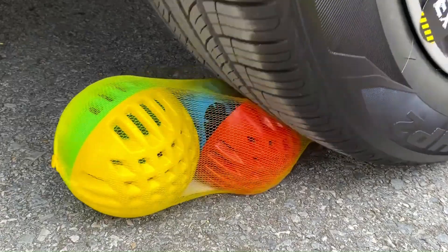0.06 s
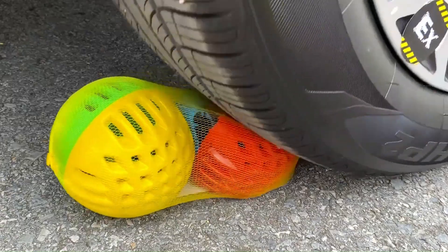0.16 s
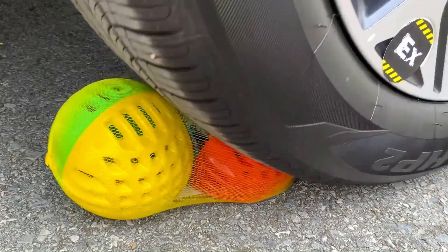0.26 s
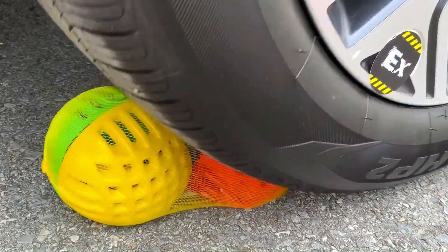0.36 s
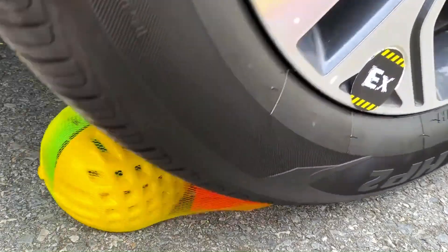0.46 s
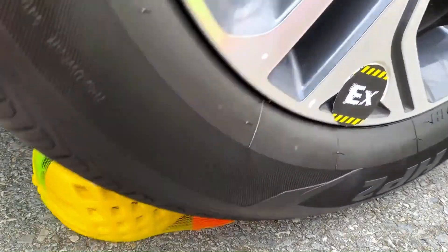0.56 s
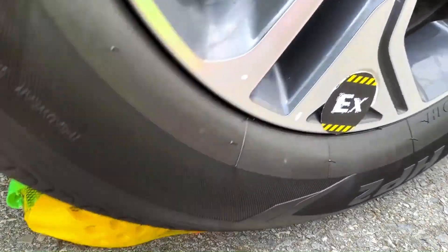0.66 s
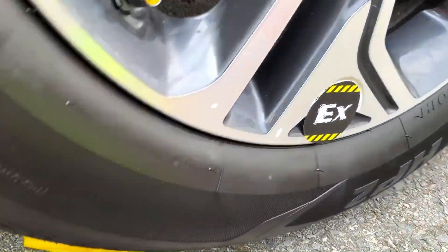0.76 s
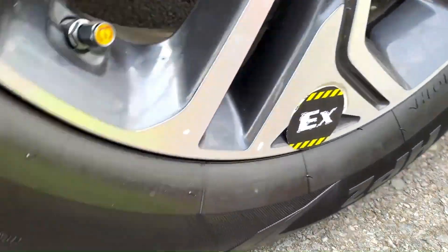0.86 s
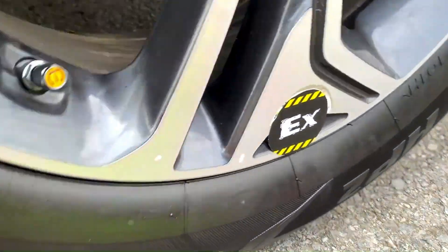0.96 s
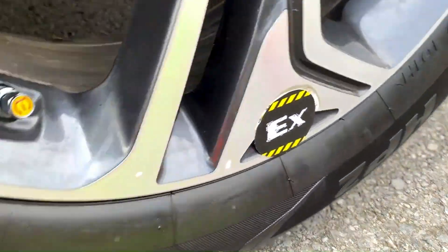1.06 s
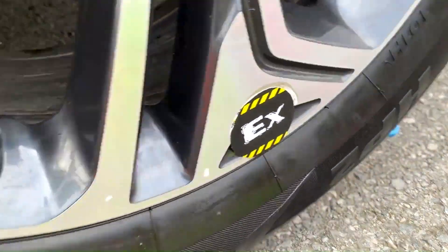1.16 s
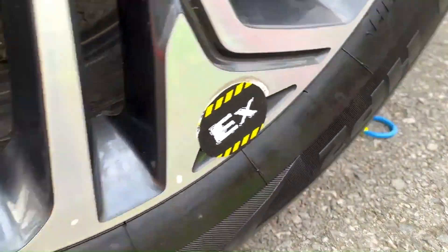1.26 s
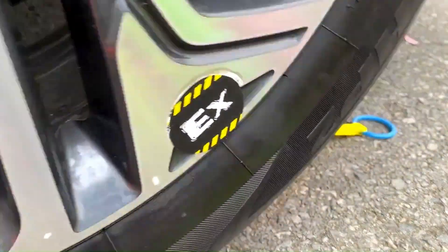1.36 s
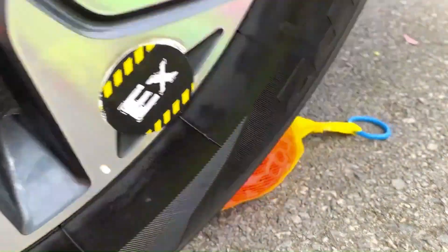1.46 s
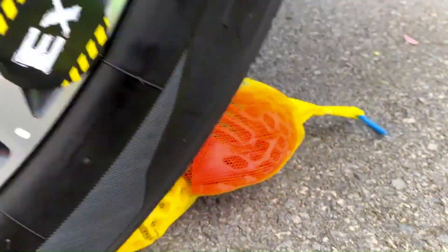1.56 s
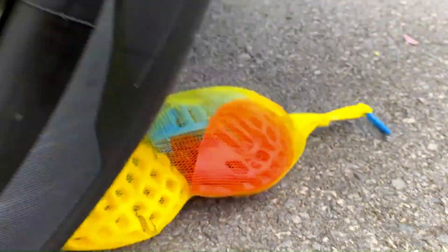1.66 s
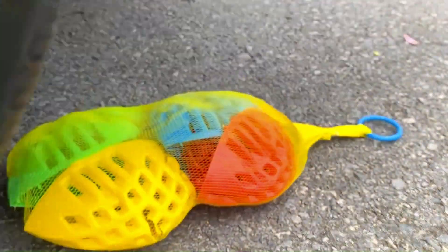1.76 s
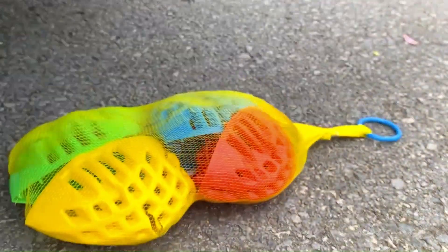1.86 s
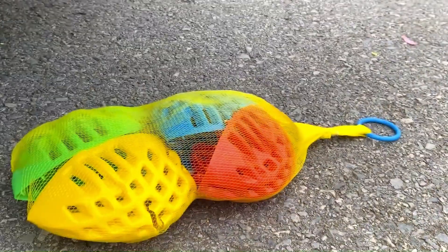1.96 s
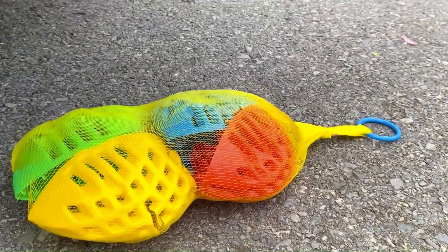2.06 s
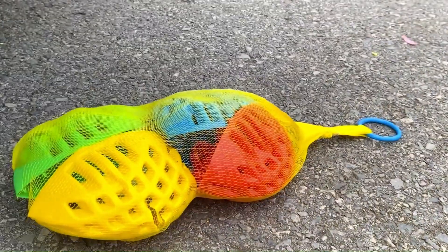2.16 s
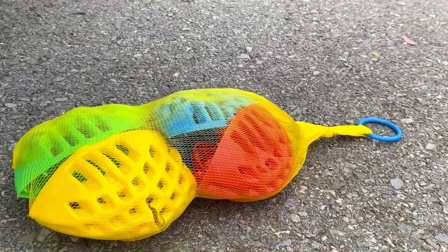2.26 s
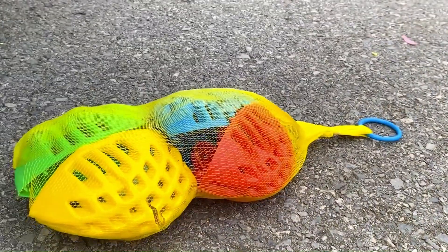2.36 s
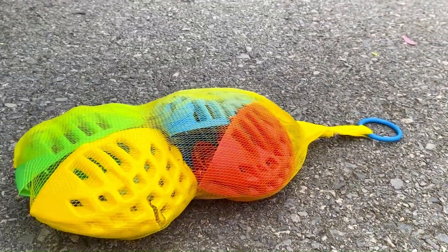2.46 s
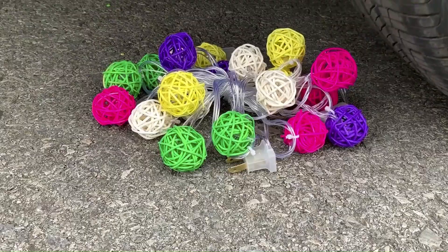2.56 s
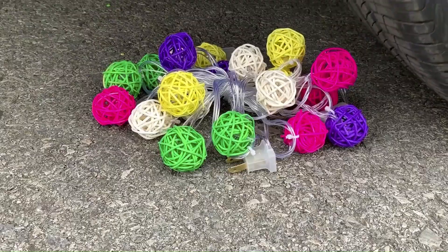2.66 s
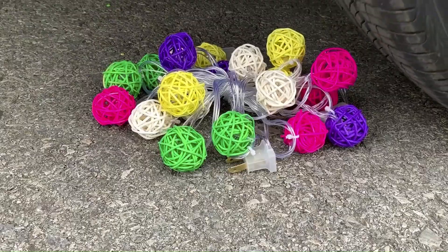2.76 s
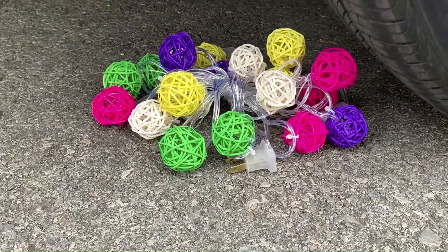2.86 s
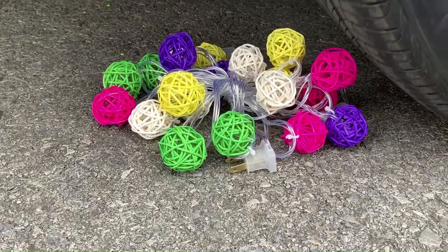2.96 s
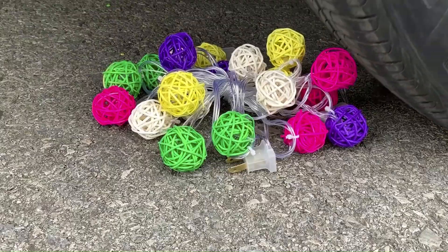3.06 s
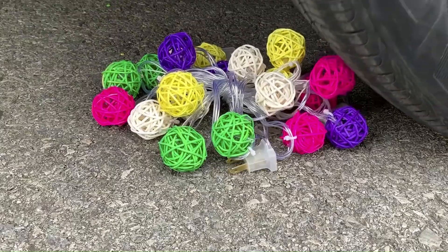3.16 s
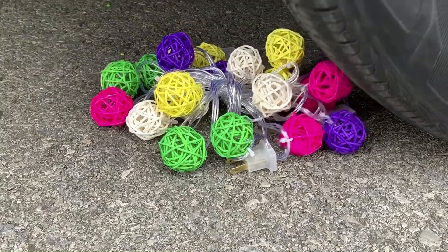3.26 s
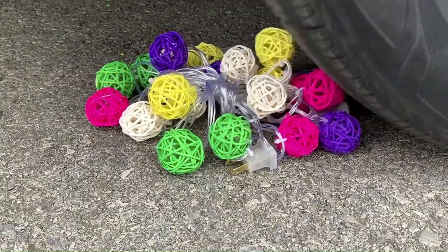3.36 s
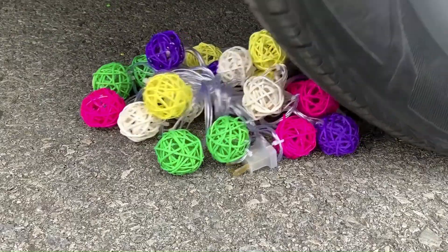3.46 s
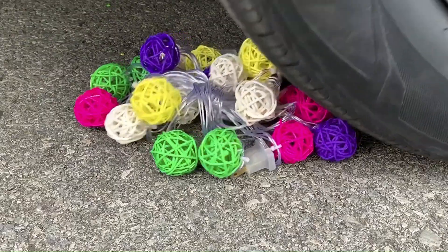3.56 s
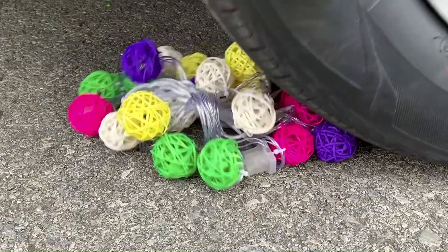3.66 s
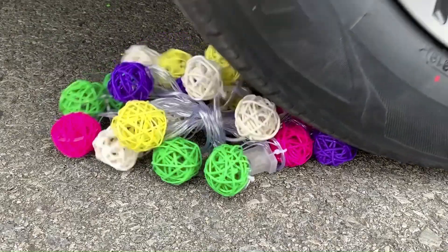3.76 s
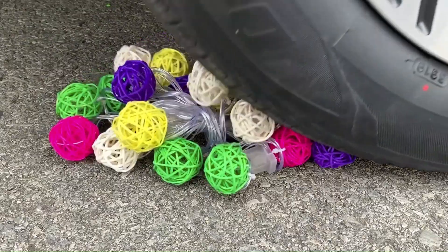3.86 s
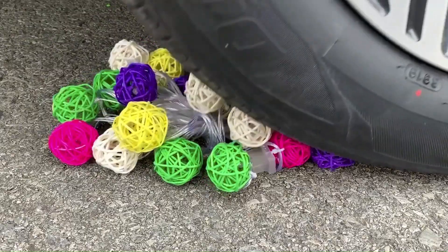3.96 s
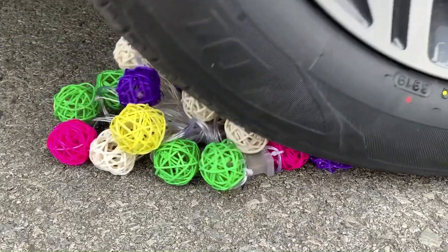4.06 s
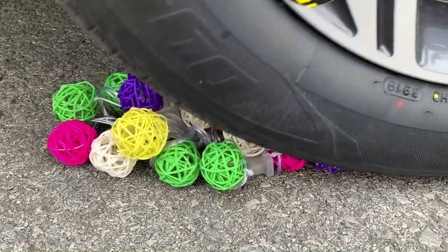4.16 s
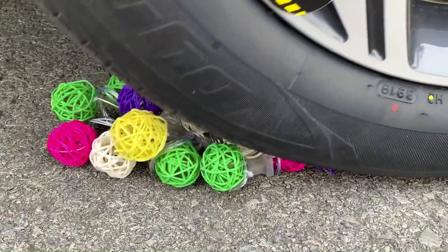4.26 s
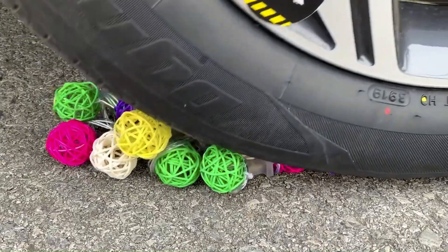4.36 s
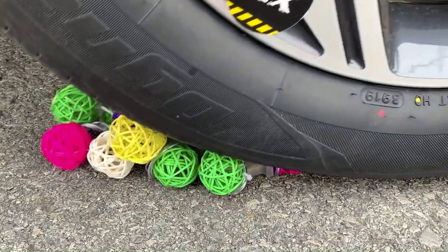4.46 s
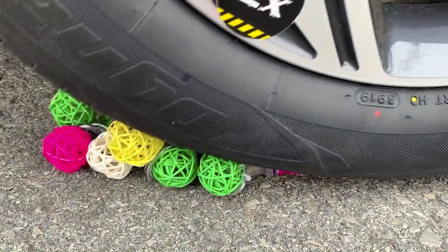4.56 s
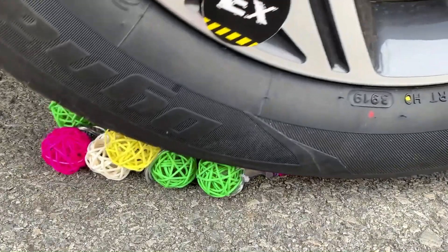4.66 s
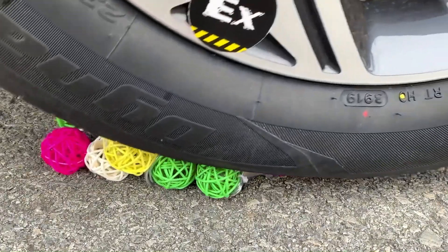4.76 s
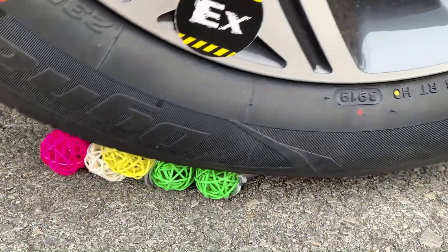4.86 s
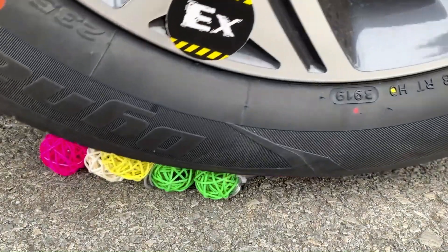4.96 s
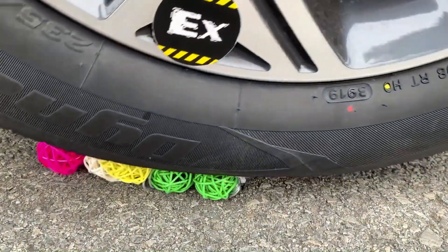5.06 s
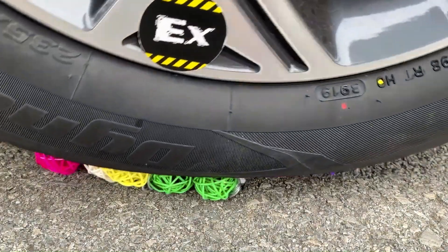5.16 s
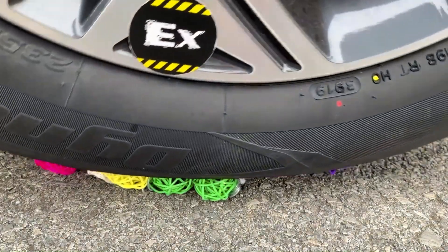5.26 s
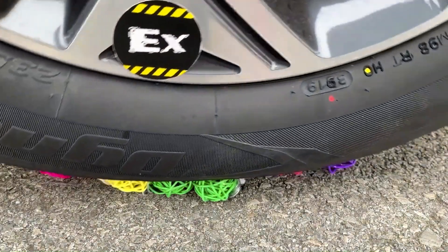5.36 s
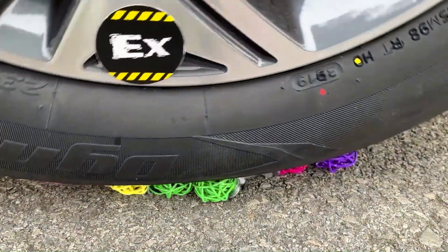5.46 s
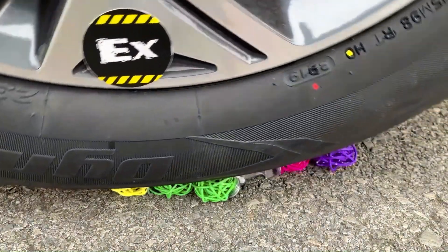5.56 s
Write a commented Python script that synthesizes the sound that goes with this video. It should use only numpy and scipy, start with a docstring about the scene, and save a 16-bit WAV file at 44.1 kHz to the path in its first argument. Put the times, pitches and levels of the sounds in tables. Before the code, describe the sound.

Two crushing scenes on a street, heard from very near by two spaced microphones. First, plastic shells pop and crunch for over a second, then only faint clicks over a low idle. A brief gap follows; then engine rumble, light regular ticking, and woven twig balls cracking crisply in clusters, with a fast ratchet-like creak and hiss beneath.

```python
"""A car tyre creeps over hollow plastic balls: ragged noise bursts and ringing modes snap, plastic whines, the
tyre rings, an engine idles as wandering tones; then the volume drops. After a brief silence a second scene
brings a rougher engine hum and a ticking valve, then woven twig balls break on asphalt, the volume up again
and the loud snaps clipped; a strand creaks by stick-slip, and the volume falls near the end.
Two spaced microphones hear it all, with street hiss and fine crackle beneath."""
import sys
import numpy as np
from scipy import signal
from scipy.fft import rfft, irfft, next_fast_len
from scipy.io import wavfile
from scipy.ndimage import uniform_filter1d, map_coordinates

SR = 44100
rng = np.random.default_rng(int(sys.argv[2]) if len(sys.argv) > 2 else 0)


def to_wav(sig):
    """Store sig (one row per channel, or 1-D mono) as 16-bit WAV at the path in sys.argv[1].

    Samples outside -1..1 are clipped; the rate is SR.
    """
    pcm = np.clip(np.atleast_2d(sig), -1, 1) * 32767
    pcm = np.round(pcm).astype(np.int16)
    wavfile.write(sys.argv[1], SR, pcm.T)  # frames by channels


N = 247249
T = np.arange(N) / SR  # time, s

# Silence between the two scenes: start and end in seconds.
SCENE_GAP_S = (2.526, 2.566)
# Engine orders of the first scene. Each row: frequency in Hz, relative level in dB.
IDLE_ORDERS = [(28.5, -11), (57, 3), (85.5, 1.5), (114, -9), (172, -8.5), (232, -9)]
# Engine bands of the second scene. Each row: frequency in Hz, relative level in dB.
CREEP_BANDS = [(49, -2), (70, -5.5), (120, -15.5), (182, -18.5), (230, -18.5)]
# Spectrum of the engine's noise. Each row: frequency in Hz, relative density in dB per Hz.
RUMBLE_SPECTRUM = [(13, -27.5), (22, -12), (49, -0.5), (119, 1), (157, -24), (224, -12), (250, -23.5),
                   (320, -47), (550, -120)]
# Spectrum of the body drone, one list per scene. Each row: frequency in Hz, relative density in dB per Hz.
DRONE_SPECTRA = [
    [(71, -45.5), (120, -6), (177, 2), (201, -18), (222, -3.5), (327, -10.5), (414, -19.5), (642, -11.5),
     (693, -25), (900, -40), (1170, -63), (1980, -120)],
    [(71, -11.5), (120, -4), (156, -13), (226, -13.5), (254, -15.5), (308, -21), (401, -13), (486, -19),
     (900, -38), (1170, -53), (1980, -120)],
]
# Spectrum of the street hiss, one list per scene. Each row: frequency in Hz, relative density in dB per Hz.
STREET_SPECTRA = [
    [(410, -38.5), (700, -1.5), (977, -1.5), (1220, -3.5), (1480, -4), (2560, -4.5), (8600, -21),
     (10500, -26), (12000, -31.5), (14500, -50.5), (15500, -90)],
    [(350, -41), (600, -3), (1090, -4), (1500, -7), (1950, -1.5), (2400, -7), (3090, -7.5), (4000, -10),
     (4450, -6.5), (5000, -15.5), (5700, -11.5), (8620, -21), (10700, -14), (12000, -30), (13200, -16.5),
     (14300, -31), (15000, -50)],
]
# Spectrum of grit and fibres crackling. Each row: frequency in Hz, relative density in dB per Hz.
FIZZ_SPECTRUM = [(2350, -34), (4000, -3.5), (4920, -13.5), (6260, -3.5), (8590, -5), (10400, 3),
                 (11900, -12), (13300, 3), (14800, -19), (16000, -61)]
# Plastic shells breaking. Each row: start in seconds, crack level in dB, then treble, knock and thump in dB over
# the crack, the piece's own note in Hz, nominal thump pitch in Hz.
SHELL_BREAKS = [(.0034, -10, 4, -16, -12, 1090, 199), (.02, 7, -10.5, -5.5, -12.5, 3210, 207),
                (.1442, -4.5, -21.5, -6.5, -4.5, 933, 283), (.168, 8.5, -14, 3.5, -8.5, 1470, 165),
                (.2066, 2, -6, -11, -9, 3954, 183), (.2808, -14.5, -13, -10, -9, 6500, 212),
                (.3089, 4, -2, -3.5, -21, 4170, 198), (.4131, -16, -7, -5.5, -22, 4810, 186),
                (.427, 6.5, -5.5, -9.5, -30.5, 7640, 174), (.463, -4, 3, -10.5, -9.5, 4480, 484),
                (.4725, 6.5, -0.5, 2.5, -13, 1570, 148), (.5148, 4.5, -22.5, -2, -4.5, 1019, 199),
                (.5506, -0.5, -1, -12, -12.5, 2530, 197), (.5745, 4.5, 2, -23.5, -2, 754, 188),
                (.607, -1, -3.5, -1, -7, 1135, 364), (.7047, 7.5, -0.5, -8.5, -14, 1140, 459),
                (.709, -13.5, -4, -22, -20.5, 7650, 167), (.7963, -7.5, -5, -11.5, -14, 793, 518),
                (.8096, 2, 1, -16, -6.5, 1162, 370), (.842, -7.5, -17.5, -11, -6, 1249, 515),
                (.8988, 1.5, 2.5, -30, -5, 6150, 145), (.9664, -16.5, 2, -6.5, 1, 800, 136),
                (1.0438, -14.5, -10.5, -5.5, -16.5, 2255, 256), (1.0513, 5, -6.5, -4.5, -7, 1117, 393),
                (1.1735, -1.5, -6.5, -18.5, -6, 3700, 390), (1.2191, -2.5, -3, -13.5, -2.5, 804, 484),
                (1.2254, -8, -9, -18, 6, 915, 248), (1.2371, 4.5, -6.5, -3.5, -1, 802, 328),
                (1.2426, -8, -7.5, -4, 1, 886, 400), (1.3641, -29, 4.5, -5.5, -8, 7400, 199),
                (1.4436, -32, -12, -3, -6.5, 3143, 197), (1.4746, -37, 7.5, -7.5, -5.5, 974, 196),
                (1.5342, -33.5, 3.5, -12, -14, 3880, 133.6), (1.5747, -31, 1, -4, -2, 1190, 131),
                (1.7793, -33, -8, -13, -15, 2100, 229.6), (1.7935, -23, -5, -17, -16.5, 4520, 148),
                (1.8997, -27, -0.5, -14, -18.5, 4430, 132), (2.1723, -29.5, -15, -2.5, -13.5, 2460, 184),
                (2.182, -32, -18, 0, -13, 1930, 184), (2.192, -34.5, -15, -4.5, -15, 2200, 184),
                (2.3356, -26.5, -4, -30, -21, 6480, 248)]
# Woven twigs breaking. Each row: start in seconds, crack level in dB, then treble, knock and thump in dB over
# the crack, the piece's own note in Hz, nominal thump pitch in Hz.
TWIG_BREAKS = [(3.5905, -22, 8, -18, -20, 848, 189), (3.705, -15, -20, -24, -25, 4630, 159),
               (3.7635, -19.5, -12, -11.5, -9.5, 802, 156), (3.8492, -10, -4.5, -22.5, -22, 3400, 170),
               (3.9386, -31, 5, -6, -1.5, 802, 130.6), (3.9634, -9, 2, -18, -18, 10100, 129.6),
               (3.9777, -6, 6, 1, -6, 10180, 333), (4.0456, -3.5, -5, -16, -19, 3480, 197),
               (4.0598, -4.5, 4.5, -2, -4.5, 1910, 420.6), (4.069, 3.5, -18, -1, -2.5, 1640, 320),
               (4.0923, -1.5, -2, -19, -12, 4960, 350.6), (4.1198, -4.5, -29, -8.5, -14, 2095, 212),
               (4.1902, 1, -15, -0.5, -12.5, 2098, 339.7), (4.238, -31.5, 5, -18, -19, 991, 191),
               (4.2851, -27.5, -9, -17.5, -11.5, 1570, 184), (4.2977, -16.5, 0, -22.5, -13, 9830, 200),
               (4.3021, -16, 1, -21, -2.5, 10400, 354), (4.3157, -14, 3, -14.5, -6, 11000, 131.4),
               (4.329, -16, 7.5, -18, -11, 9850, 134), (4.377, -20.5, 5.5, -17.5, -18, 2140, 148),
               (4.4139, -22, 9.5, -10.5, -15.5, 10280, 132), (4.4419, -28, 2.5, -12.5, -11, 1910, 132),
               (4.5422, -25, 5.5, -19, -9, 10200, 132), (4.6075, -9, -1, -3.5, -2, 1110, 254),
               (4.6175, -4.5, -5, -13.5, -3.5, 1250, 302), (4.629, -1.5, 0, -7.5, 4, 1240, 330),
               (4.6394, -21.5, 3, -3, 2, 856, 263.6), (4.6921, -6, -8, -11, -1, 1258, 429.3),
               (4.6954, -15.5, 16, -19.5, -8, 9760, 194), (4.793, -30.5, 10, -8.5, -12, 1030, 194),
               (4.9024, -3, 4, -8.5, -11.5, 10850, 251.3), (4.948, -10, 4, -21, 3, 10160, 210.3),
               (5.0912, -15.5, 19, -2, -11, 10900, 210), (5.1046, -13.5, -10.5, -1.5, -5, 9180, 127),
               (5.115, -16.5, -8, -12, -6.5, 6260, 155), (5.1681, -4.5, -4.5, -4, -7, 914, 246.7),
               (5.2165, -22, 8.5, 0, 1.5, 10100, 272), (5.2692, -23, -11.5, -10, 5.5, 1900, 147.4),
               (5.3341, -22.5, -8, -13, -3.5, 2100, 136), (5.4266, -21.5, 8.5, -17, -0.5, 10800, 132),
               (5.5728, -23, 10.5, -14, -1.5, 10200, 176)]
# Stick-slip of a strand. Each row: time in seconds, slips so far, relative level in dB.
SLIPS_SO_FAR = [(4.8235, 0, -13), (4.8445, 1, -13), (4.8915, 4, -9), (4.936, 7, -4), (4.948, 8, -2),
                (4.989, 11, -2), (5.001, 12, -2), (5.043, 18, -6), (5.087, 25, -8)]
# Resonances of the strand. Each row: frequency in Hz, bandwidth in Hz, relative level in dB.
STRAND_MODES = [(5130, 750, 1.5), (10830, 920, 8), (13500, 5900, -4)]
# Spectrum of a break's crack. Each row: frequency in Hz, relative density in dB per Hz.
CRACK_SPECTRUM = [(880, -42), (1500, -7.5), (3000, -3), (3290, -2), (4900, -2.5), (5480, -5.5),
                  (7510, -10.5), (8000, -8), (10400, -29), (17600, -120)]
# Spectrum of a break's treble. Each row: frequency in Hz, relative density in dB per Hz.
TREBLE_SPECTRUM = [(3820, -36), (6500, -3.5), (7860, -3.5), (8780, -16), (9350, -2), (10700, -1),
                   (11900, -13.5), (13800, -2), (15800, -27.5)]
# Spectra of a break's knock and thump. Each row: frequency in Hz, relative density in dB per Hz.
KNOCK_SPECTRUM = [(500, -20.0), (800, -9), (1500, -2.0), (2300, -17.0)]
THUMP_SPECTRUM = [(90, -31.5), (160, 5), (350, -5.5), (650, -6.5), (1000, -35.0)]
# Tyre modes, two of the air cavity, then the carcass. Each row: frequency in Hz, relative level in dB, t60 in s.
TYRE_MODES = [(194.5, -1.5, 1.08), (255, -0.5, 0.1), (611, -17, 0.65), (733, -11.5, 0.36), (876, -22, 0.3),
              (926, -21.5, 0.6)]
# Reflections from ground and car body. Each row: frequency in Hz, t60 in seconds.
ECHO_DECAY = [(200, 0.036), (1500, 0.1), (5000, 0.081), (14000, 0.015)]
# Left-right likeness of the background noise. Each row: frequency in Hz, correlation from 0 to 1.
LIKENESS = [(60, 1), (150, .92), (400, 0.9), (1500, 0.29), (5000, 0.1), (15000, 0.086)]
# Modes of a plastic shell. Each row: nominal frequency in Hz, relative level in dB, t60 in seconds.
SHELL_MODES = [(7750, -4, .04), (1097, -9.5, .04), (3120, -5, .03), (4700, -8.5, .04), (2067, -11, .035)]
# Modes of a twig. Each row: nominal frequency in Hz, relative level in dB, t60 in seconds.
TWIG_MODES = [(10700, -8, 0.01), (3380, -16, 0.031), (1840, -10, 0.11), (6270, -11.5, 0.12),
              (12200, 2, .02)]
# Blows that set the tyre ringing. Each row: time in seconds, cavity level in dB, carcass level in dB.
TYRE_BLOWS = [(.021, -28, -31), (.172, -31, -35.5), (0.282, -20.5, -21.5), (.474, -13.5, -35),
              (.575, -30, -33), (.809, -35.5, -34.5), (.9, -27.5, -38.5), (1.052, -33.5, -34.5),
              (1.245, -17, -15), (4.07, -20, -34), (4.615, -15, -42), (4.635, -29, -33), (4.905, -15, -45)]
# Stressed plastic starts to whine. Each row: start in seconds, relative level in dB.
SQUEAK_STARTS = [(.212, -31), (.315, -19), (.468, -18), (.56, -23.5), (.71, -14.5), (.85, -26.5)]
# Jumps of the volume knob. Each row: time in seconds, gain in dB from then on.
VOLUME_STEPS = [(0, 0), (1.59, -17), (2.566, -17), (3.922, -0.5), (5.289, -12)]
# Level of the background hum and hiss, before the volume steps; it dips briefly around 4.2 s and 4.8 s. Each
# row: time in seconds, relative level in dB.
BACKGROUND_LEVEL = [(0, -19.5), (.15, -29.5), (.3, -24), (.65, -20), (.9, -28), (1.55, -29.5),
                    (1.75, -28.5), (2.3, -25), (2.52, -26.5), (2.57, -16), (3.0, -17.5), (3.9, -16),
                    (3.95, -15), (4.1, -18.5), (4.18, -21.5), (4.55, -15.5), (4.8, -24.5), (5.06, -17),
                    (5.3, -20), (5.6, -24)]
# Level of the fine crackle under the tread, before the volume steps. Each row: time in seconds, relative level
# in dB.
CRACKLE_LEVEL = [(0, -47), (.08, -44.5), (.25, -31.5), (.7, -31), (.87, -30), (.98, -59.5), (1.5, -46.5),
                 (1.85, -46.5), (2.5, -55.5), (2.57, -57), (3.4, -44.5), (3.75, -25.5), (4.0, -36.5),
                 (4.17, -45.5), (4.32, -25), (4.66, -54), (4.85, -44), (5.06, -15.5), (5.22, -39),
                 (5.45, -28), (5.6, -31.5)]

DRONE_DB, HISS_DB = (-8, -5.5), (-14.5, -12)  # over the background level, in each scene
TAPPET_HZ, TAPPET_RATE_HZ, TAPPET_START_S, TAPPET_DB = 5700, 10.4, 2.685, -17  # dB over the background level
SLIP_T60_S, SLIP_RISE_S = .009, 0.00093
SQUEAK_HZ, SQUEAK_RISE_S, SQUEAK_T60_S = 4900, .004, .35  # mean pitch
RING_SCATTER_DB = 3.5  # standard deviation of mode levels
TOP_HZ = 16050  # upper band limit


def amp(db):
    """The decibel law: level in dB to amplitude ratio."""
    return 10 ** (np.asarray(db) / 20)


def unit(x):
    """Normalisation to a root mean square of 1."""
    return x / np.sqrt(np.mean(x ** 2) + 1e-20)


def along(points, hz):
    """Interpolation of (Hz, value) points on a logarithmic frequency axis."""
    f, v = np.transpose(points)
    return np.interp(np.log(hz + 1), np.log(f + 1), v)


def curve(rows):
    """Linear interpolation of (s, value) rows to one value per sample."""
    return np.interp(T, *np.transpose(rows))


def wobble(rate):
    """Smooth random fluctuation: a spline through rate random knots a second."""
    knots = rng.standard_normal(int(N * rate / SR) + 4)
    return map_coordinates(knots, [T * rate])


def filtered(x, response):
    """Linear filtering: the spectrum times a complex response of frequency."""
    m = next_fast_len(N + SR)
    hz = np.fft.rfftfreq(m, 1 / SR)
    return irfft(rfft(x, m) * response(hz), m)[..., :N]


def spaced(lag_s):
    """Travel-time difference as linear phase: the left microphone hears lag_s earlier than the right."""
    return lambda hz: np.exp(1j * np.pi * hz * lag_s * np.array([[1], [-1]]))


def rush(spectrum, patchy_db, lag_s):
    """Shaped stereo noise of rms 1: patchy gain in time and frequency, partial left-right correlation."""
    z = signal.stft(rng.standard_normal((2, N)), nperseg=512)[2]
    field = uniform_filter1d(rng.standard_normal(z.shape[1:]), size=6, axis=0)
    field = uniform_filter1d(field, size=10, axis=1)
    pair = signal.istft(z * amp(patchy_db * unit(field)), nperseg=512)[1][:, :N]

    def shares(hz):
        turn = np.arccos(np.clip(along(LIKENESS, hz), -1, 1)) / 2
        return amp(along(spectrum, hz)) * [np.cos(turn), np.sin(turn)]
    mid, side = filtered(pair, shares)
    return unit(filtered(np.array([mid + side, mid - side]), spaced(lag_s)))


def hum(lines, waver, drift, rate):
    """Modulated tones of joint rms 1: size and pitch wander, rate knots a second."""
    total = 0
    for hz, db in lines:
        size = amp(db) * (1 + waver * wobble(rate))
        pitch = hz * (1 + drift * wobble(rate))
        total = total + size * np.sin(2 * np.pi * np.cumsum(pitch) / SR)
    return unit(total)


def street_hiss(level_db, first):
    """Broadband noise of the street, its level fluttering."""
    noise = np.where(first, rush(STREET_SPECTRA[0], patchy_db=2.5, lag_s=.0004),
                     rush(STREET_SPECTRA[1], patchy_db=1.3, lag_s=.0004))
    return amp(level_db) * noise * amp(1.5 * wobble(70))


def body_drone(level_db, first):
    """Structure-borne noise of the car body, with three wandering panel tones in the first scene."""
    panel = .09 * hum([(610, 0), (635, 0), (660, -3)], waver=.9, drift=.02, rate=9)
    noise = np.where(first, panel + rush(DRONE_SPECTRA[0], patchy_db=2.5, lag_s=.0004),
                     rush(DRONE_SPECTRA[1], patchy_db=2.0, lag_s=0.00048))
    return amp(level_db) * noise


def engine(level_db, first):
    """Periodic firing as wandering low tones, accompanied by random rumble."""
    idle = .85 * hum(IDLE_ORDERS, waver=.2, drift=.012, rate=7)
    creep = 0.79 * hum(CREEP_BANDS, waver=0.66, drift=.07, rate=13)
    tones = np.where(first, idle, creep) * amp([[-1.2], [1.2]])  # right slightly louder
    rumble = np.where(first, .4, .6) * rush(RUMBLE_SPECTRUM, patchy_db=-4.5, lag_s=.0003)
    return amp(level_db) * (tones + rumble)


def tappet():
    """Periodic impulses excite a damped metal mode: a short, regular tick of uneven strength."""
    times = np.arange(TAPPET_START_S, T[-1], 1 / TAPPET_RATE_HZ)
    strength = amp(rng.normal(0, 2.5, len(times)))
    spikes = np.bincount(np.round(times * SR).astype(int), strength, N)
    t = T[:SR // 20]
    ring = amp(-60 * t / .04) * np.sin(2 * np.pi * TAPPET_HZ * t)
    return filtered(signal.fftconvolve(spikes, ring)[:N], spaced(0.00013))


def crackle():
    """Many tiny breaks of grit and fibres merge into treble noise of grainy amplitude."""
    grit = amp(5 * wobble(160) + 3.5 * wobble(21))
    return amp(curve(CRACKLE_LEVEL)) * unit(grit * rush(FIZZ_SPECTRUM, patchy_db=0.0, lag_s=.0001))


def background():
    """Superposition of engine, body drone, street hiss, fine crackle and ticking valve."""
    first = T < SCENE_GAP_S[0]
    level_db = curve(BACKGROUND_LEVEL)
    drone = body_drone(level_db + np.where(first, *DRONE_DB), first)
    hiss = street_hiss(level_db + np.where(first, *HISS_DB), first)
    ticks = amp(level_db + TAPPET_DB) * tappet()
    return engine(level_db, first) + (drone + hiss) * amp([[-.8], [.8]]) + crackle() + ticks


def tyre():
    """Modal superposition: each blow tops up the cavity and carcass modes, which then decay exponentially."""
    out, t = np.zeros(N), T[:SR]
    at_s, cavity_db, carcass_db = np.transpose(TYRE_BLOWS)
    at = np.round(at_s * SR).astype(int)
    cavity, carcass = (np.bincount(at, amp(db), N) for db in (cavity_db, carcass_db))
    for k, (hz, db, t60) in enumerate(TYRE_MODES):
        decay = amp(db - 60 * t / t60) * (1 - np.exp(-t / 0.0024))
        size = signal.fftconvolve(cavity if k < 2 else carcass, decay)[:N]
        out += amp(0.4 * wobble(43)) * size * np.sin(2 * np.pi * hz * T)
    return out


def squeak():
    """Frictional whine: an unsteady tone, started anew as the shells fold, with exponential decay."""
    s, db = np.transpose(SQUEAK_STARTS)
    t = T[:SR // 2]
    starts = np.bincount(np.round(s * SR).astype(int), amp(db), N)
    envelope = amp(-60 * t / SQUEAK_T60_S) * (1 - np.exp(-t / SQUEAK_RISE_S))
    size = signal.fftconvolve(starts, envelope)[:N] * amp(3.5 * wobble(250))
    pitch = SQUEAK_HZ * (1 + .015 * wobble(300) + .01 * wobble(15))
    return filtered(size * np.sin(2 * np.pi * np.cumsum(pitch) / SR), spaced(.0001))


def strand_response(f):
    """Sum of second-order resonances of alternating sign."""
    return sum((-1) ** k * amp(db) * 1j * f * width / (centre * centre - f * f + 1j * f * width)
               for k, (centre, width, db) in enumerate(STRAND_MODES))


def creak():
    """Stick-slip: each slip is a noise puff into the strand's resonances plus a small low push."""
    s, count, slip_db = np.transpose(SLIPS_SO_FAR)
    times = np.interp(np.arange(count[-1] + 1), count, s)
    spikes = np.zeros(N)
    strength_db = np.interp(times, s, slip_db) + rng.normal(0, 2.5, len(times))
    spikes[np.round(times * SR).astype(int)] = amp(strength_db)
    t = np.arange(SR // 20) / SR
    envelope = amp(-60 * t / SLIP_T60_S) * (1 - np.exp(-t / SLIP_RISE_S))
    puffs = signal.fftconvolve(spikes, envelope)[:N] * rng.standard_normal(N)
    thud = -.4 * np.sin(2 * np.pi * 195 * t) * amp(-60 * t / .025)
    push = signal.fftconvolve(spikes, thud)[:N]
    return filtered(3.5 * filtered(puffs, strand_response) + push, spaced(0.00013))


def splinter_noise(ragged_db, apart):
    """Partly correlated noise in crack, treble, knock and thump bands, of ragged amplitude."""
    spectra = (CRACK_SPECTRUM, TREBLE_SPECTRUM, KNOCK_SPECTRUM, THUMP_SPECTRUM)
    both, own = rng.standard_normal((4, 1, N)), rng.standard_normal((4, 2, N))
    # each microphone faces other splinters
    share = apart * np.array([1.7, 1.7, 2.3, 0.26])[:, None, None]
    ragged = (both + share * own) * amp(ragged_db * wobble(700))
    bands = filtered(ragged, lambda hz: amp([[along(points, hz)] for points in spectra]))
    return [unit(b) for b in bands]


def breaks(rows, modes, t60, lead_in_db, ring_db, ragged_db, top_hz, lag_s, apart):
    """Brittle fracture: a burst in four bands, the piece's modes and a falling knock through the tyre wall."""
    bands = splinter_noise(ragged_db, apart)
    lead = SR // 25
    out, t = np.zeros((2, N + SR)), np.arange(SR // 7) / SR
    around = np.arange(-lead, SR // 6) / SR
    before, after = np.minimum(around, 0), np.maximum(around, 0)
    lives, early = (0.85, 1.3, 1.1, 2.1), (8, -14.5, 0, -10.5)  # per band: times t60; dB over the lead-in
    lucks = rng.standard_normal((len(rows), 12))
    for (s, db, treble_db, knock_db, thump_db, note_hz, thump_hz), luck in zip(rows, lucks):
        i = round(s * SR)
        at = np.arange(i - lead, i - lead + len(around))
        ok = (at >= 0) & (at < N)
        over_crack_db = (0, treble_db, knock_db, thump_db + 0.5)
        for band, rel_db, life, early_db in zip(bands, over_crack_db, lives, early):
            # short noise swell leading into each snap
            swell = amp(lead_in_db + early_db + 60 * before / 0.018) + amp(-19.5 + 60 * before / 0.014)
            snap = amp(-60 * after / (t60 * life)) + 0.76 * amp(-60 * after / 0.0061)
            crumbs = amp(-28.5 - 60 * after / 0.19)
            envelope = np.where(around < 0, swell, snap + crumbs)
            out[:, at[ok]] += amp(db + rel_db - 4.5) * envelope[ok] * band[:, at[ok]]
        ring = out[:, i:i + len(t)]  # a view: adding to it adds to out
        detune = 1 + 0.018 * luck[1]
        for (hz, level_db, decay_s), scatter in zip(modes, luck[2:]):
            size = amp(db + ring_db + level_db + RING_SCATTER_DB * scatter - 60 * t / decay_s)
            ring += size * np.sin(2 * np.pi * hz * detune * t)
        ring += amp(db + 1.5 - 60 * t / (0.43 * t60)) * np.sin(2 * np.pi * note_hz * t)
        # bending waves: high notes arrive first
        pitch = thump_hz * (.6 + .8 * np.exp(-t / 0.0066))
        pitch = pitch + top_hz * amp(1.9 * luck[0]) * np.exp(-t / .0017)
        size = amp(db + thump_db + 1.5 - 60 * t / (1.4 * t60 + .018))
        ring += size * np.sin(2 * np.pi * np.cumsum(pitch) / SR)
    return filtered(out[:, :N], spaced(lag_s))


def echoes(x):
    """Diffuse reflection: convolution with decaying noise, different at each microphone."""
    hz, t, z = signal.stft(rng.standard_normal((2, SR // 3)), SR, nperseg=256)
    decay = amp(-60 * t / along(ECHO_DECAY, hz)[:, None])
    tail = signal.istft(z * decay, SR, nperseg=256)[1]
    return signal.fftconvolve(x, tail / np.linalg.norm(tail[0]), axes=1)[:, :N]


def scene():
    """Superposition of breaks, creak and squeak with reflections, tyre ring and background."""
    shells = breaks(SHELL_BREAKS, SHELL_MODES, t60=0.025, lead_in_db=-18.5, ring_db=-21.0, ragged_db=2.0,
                    top_hz=1221, lag_s=.00011, apart=1.0)
    twigs = breaks(TWIG_BREAKS, TWIG_MODES, t60=0.026, lead_in_db=-21, ring_db=-21.5, ragged_db=5.5,
                   top_hz=800, lag_s=.00008, apart=0.98)
    near = shells + twigs + creak() + squeak()
    return near + amp(-10.5) * echoes(near) + tyre() + background()


def record(dry):
    """Stepped gain, smooth saturation of the peaks near full scale, then band limitation."""
    s, db = np.transpose(VOLUME_STEPS)
    gain = amp(db[np.searchsorted(s[1:], T)])
    audible = (T < SCENE_GAP_S[0]) | (T > SCENE_GAP_S[1])
    loud = dry * gain * audible
    clipped = loud / (1 + np.abs(loud / .98) ** 8) ** (1 / 8)
    return filtered(clipped, lambda hz: np.clip((TOP_HZ - hz) / 400, 0, 1) ** 2)


dry = scene()
out = record(dry)
to_wav(out)
```